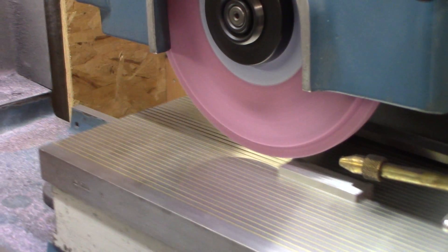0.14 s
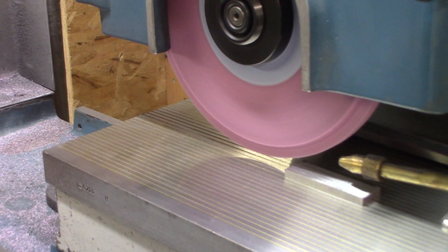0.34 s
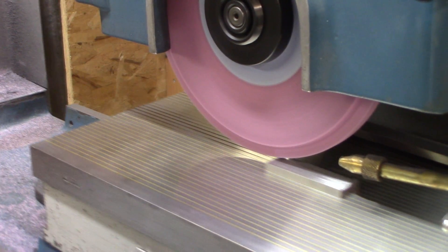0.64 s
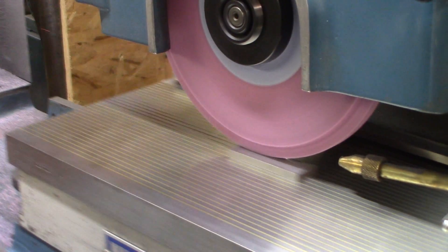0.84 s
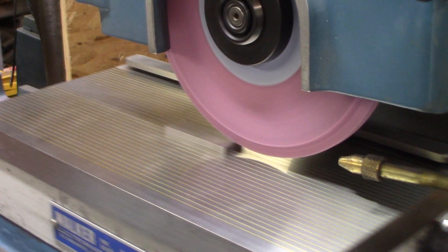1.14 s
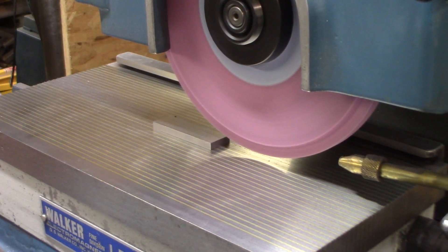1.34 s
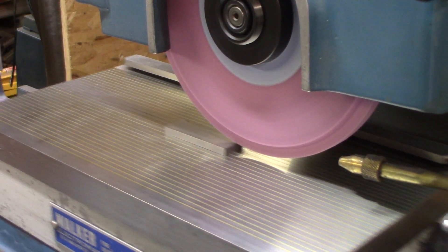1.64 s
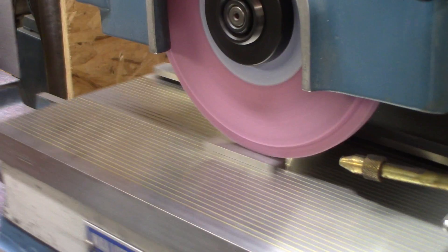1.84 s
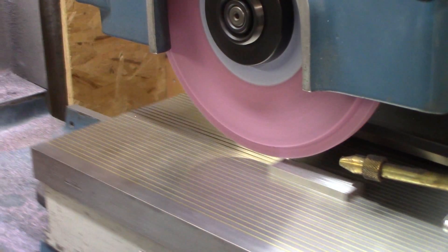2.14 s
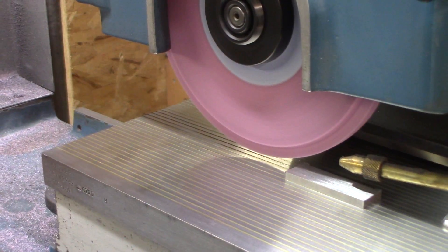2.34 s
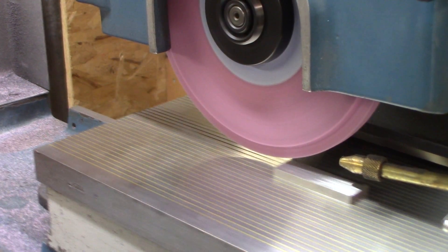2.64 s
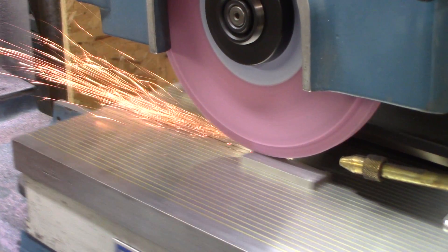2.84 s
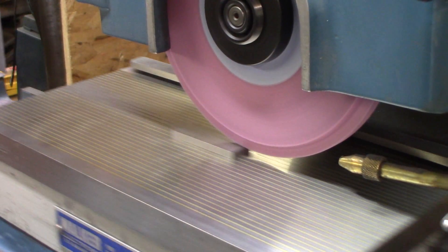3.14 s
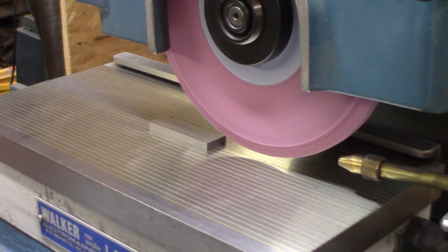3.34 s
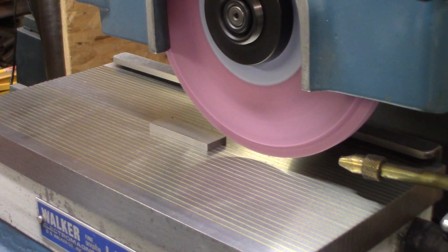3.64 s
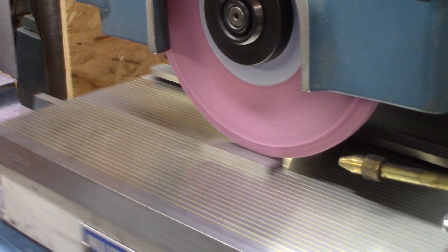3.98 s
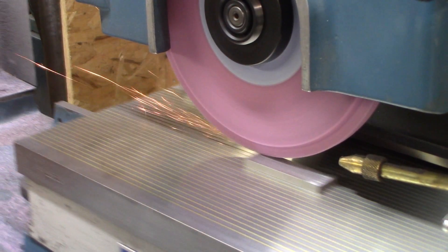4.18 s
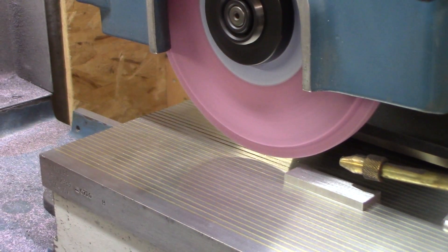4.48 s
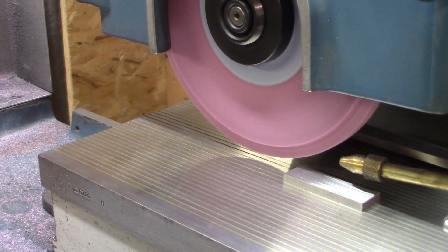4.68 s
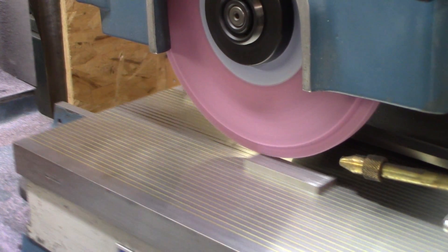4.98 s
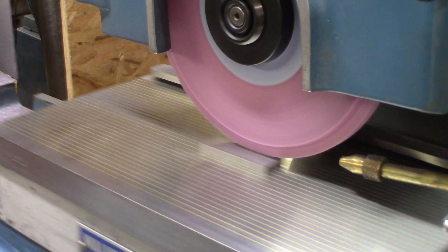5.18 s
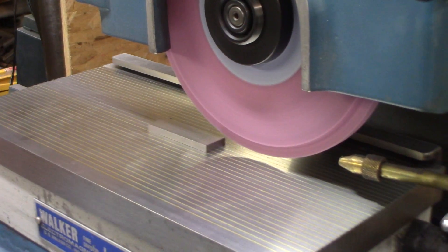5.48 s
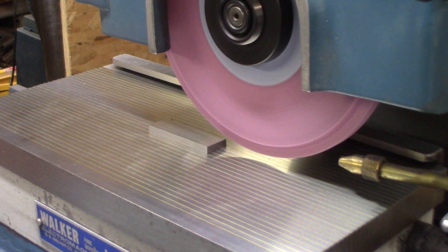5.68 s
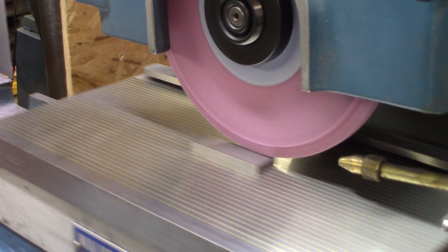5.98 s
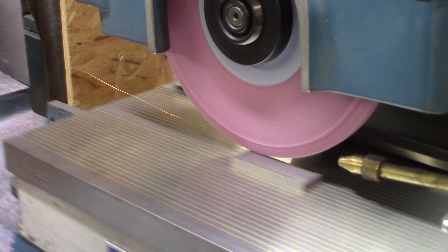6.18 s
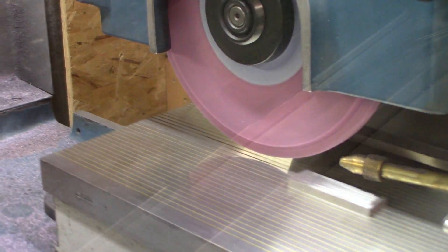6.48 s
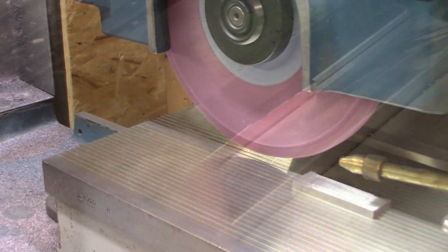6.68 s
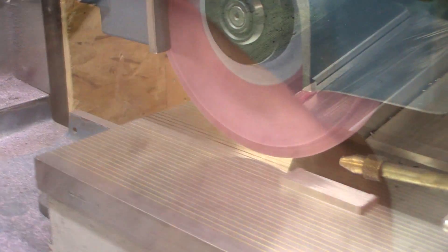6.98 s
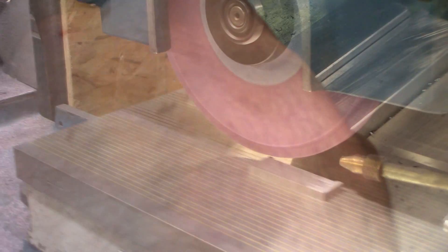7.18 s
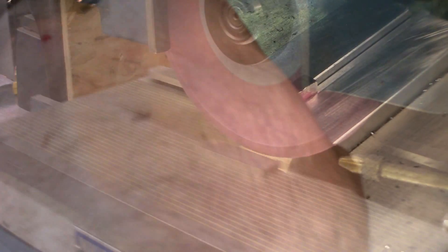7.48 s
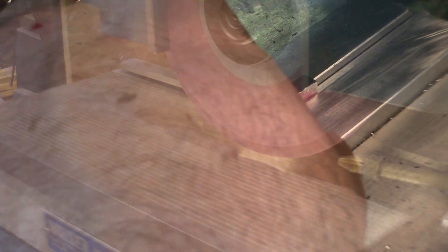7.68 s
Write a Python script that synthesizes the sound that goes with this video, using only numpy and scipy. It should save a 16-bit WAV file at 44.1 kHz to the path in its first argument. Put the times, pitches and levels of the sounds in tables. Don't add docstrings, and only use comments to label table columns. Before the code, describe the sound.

Close stereo sound of a surface grinder running in a machine shop. Worn bearings sing a cluster of wavering metallic tones over motor hum and a soft rush of air. A steel block passes under the wheel about once a second, giving tiny bright gritty zips, some ringing, others barely grazing. The machine fades toward the end.

```python
import sys
import numpy as np
from scipy import signal
from scipy.fft import rfft, irfft, next_fast_len
from scipy.io import wavfile
from scipy.ndimage import uniform_filter1d, minimum_filter1d

SR = 44100
rng = np.random.default_rng(int(sys.argv[2]) if len(sys.argv) > 2 else 0)


def dump(signal):
    limited = np.clip(np.atleast_2d(signal).T, -1, 1)
    pcm = np.round(limited * 32767).astype(np.int16)
    wavfile.write(sys.argv[1], SR, pcm)


def gain_from_db(level_db):
    decades = np.asarray(level_db, float) / 20
    return 10 ** decades


N = 344848
T = np.arange(N) / SR
M = next_fast_len(N, True)
BINS = np.maximum(np.arange(M // 2 + 1) * SR / M, 1)
BALL_HZ, CAGE_HZ, SHAFT_HZ = 407.78, 25.78, 59.88


def shape(table, hz=BINS):
    table_hz, level_db = np.array(table).T
    return np.interp(np.log(hz), np.log(table_hz), level_db)


def noise(power):
    return irfft(rfft(rng.standard_normal(M)) * np.sqrt(power * SR / 2), M)[:N]


# pitch_hz, level_db
SIDE_DB = [(60, -20), (110, -13), (200, -15.5), (380, -17.5), (700, -19), (1290, -22), (2380, -8),
           (4400, -13.5), (8120, -14), (15000, -12)]


def stereo(power, side_db=0.):
    side_power = power * gain_from_db(2 * (shape(SIDE_DB) + side_db))
    return noise(power) + noise(side_power) * np.array([[1], [-1]])


def lines(hz, db, width_hz):
    power = np.zeros(len(BINS))
    for f, gain, w in zip(hz, gain_from_db(db), width_hz):
        first = max(int((f - 4 * w) * M / SR), 0)
        near = slice(first, int((f + 4 * w) * M / SR) + 2)
        bell = np.exp(-.5 * ((BINS[near] - f) / w) ** 2)
        power[near] += gain ** 2 * bell / (bell.sum() * SR / M)
    return power


def walk(rate):
    hold = int(SR / rate)
    steps = np.repeat(rng.standard_normal(N // hold + 1), hold)
    slewed = uniform_filter1d(uniform_filter1d(steps, hold), hold)[:N]
    return slewed / slewed.std()


def swell(rows, rest_db=-45):
    t = T[::64]
    level = gain_from_db(rest_db)
    for peak, length, db in rows:
        level = level + gain_from_db(db) * np.cos(np.pi * np.clip((t - peak) / length, -.5, .5))
    return np.interp(T, t, level)


# start_s, slip_turns (whole turns throb in level, half turns in pitch)
CAGE_SLIP = [(0, .3), (.45, .55), (.8, .25), (1.6, .05), (2.25, .48), (2.45, .55), (2.65, 1), (3.05, .7),
             (3.25, .32), (3.65, .29), (3.85, -.04), (4.05, -.11), (4.45, .27), (4.65, .53), (5.25, .55),
             (5.45, .8), (6.1, .73), (6.65, 1.32), (7.2, 1.6)]
# start_s, slip_turns (whole turns: crisp beads)
THIRD_SLIP = [(.1, .33), (.4, .62), (1, 1.1), (1.3, .74), (2.2, .5), (3.1, .14), (3.4, -.37), (4, -.4),
              (4.3, .06), (5.2, .4), (5.8, -.42), (6.7, -.1), (7.2, -.1)]


def bearing(table, orders, lean, spin, start, slip=.1):
    side = np.array([[.5], [-.5]])
    lower = 2 * np.pi * np.interp(T, *np.transpose(CAGE_SLIP))
    third = 2 * np.pi * np.interp(T, *np.transpose(THIRD_SLIP)) - lower
    out = 0
    for (ball, cage), rows, (pan_db, lead) in zip(orders, table, lean):
        phase = ball * spin + start[ball] + slip * walk(2.89)
        phase = phase + 2 * np.pi * cage * (CAGE_HZ * T + 0.1098 * ball)
        if cage < 0:
            phase = phase + lower
        elif cage == 2:
            phase = phase - 1
        elif cage == 3:
            phase = phase + third
        tone = swell(rows) * np.exp(1j * phase)
        out = out + (np.sqrt(2) * gain_from_db(pan_db * side) * np.exp(1j * lead * side) * tone).imag
    return out


# left_minus_right_db, left_lead_rad.
SONG_A_ORDERS = [(2, 0), (2, 1), (3, 0), (4, 0)]
SONG_A = [
    [(0.07, 4.9, -17.5), (0.41, 0.85, -33), (1.11, 0.33, -44), (1.89, 1.75, -27.5), (2.02, 0.43, -29),
     (2.28, 0.22, -39.2), (3.31, 1.55, -23), (3.67, 0.38, -38.1), (4.96, 3.57, -23.5), (5.77, 1.6, -25),
     (5.96, 0.85, -26.5), (7.36, 2.1, -19), (7.49, 0.33, -36)],
    [(0.08, 0.44, -39), (0.8, 0.44, -41.3), (1.5, 0.34, -41), (2.64, 1.4, -30.5), (2.95, 0.62, -30.5),
     (3.5, 0.64, -27), (4.21, 0.72, -27.5), (4.67, 0.41, -30), (5.04, 0.45, -30.5), (5.18, 2.1, -35.1),
     (5.58, 0.48, -29), (6.86, 0.32, -44), (7.13, 1.46, -31)],
    [(0.13, 0.77, -26.5), (0.81, 3.46, -33.5), (1.0, 0.32, -49), (2.33, 1.8, -28), (2.42, 0.64, -34),
     (3.0, 0.58, -36), (3.74, 0.79, -36), (3.81, 4.3, -30), (5.29, 0.31, -39.9), (5.55, 1.63, -24),
     (6.68, 0.36, -39), (7.29, 1.8, -26), (7.65, 0.46, -33)],
    [(0.28, 1.12, -13), (0.56, 0.52, -26), (1.13, 0.63, -25.5), (1.35, 1.05, -11.5), (2.36, 0.84, -20.5),
     (2.61, 0.41, -22), (3.35, 0.78, -15.5), (3.95, 5.3, -25.5), (4.18, 0.53, -18.5), (5.12, 0.56, -22),
     (5.91, 0.45, -23), (6.35, 3.11, -18), (6.78, 0.59, -29)],
]
SONG_A_LEAN = [(-1.55, -0.011), (1.5, -.09), (2, -.03), (-1.2, -0.078)]
SONG_B_ORDERS = [(7, -1), (7, 1), (8, 1)]
SONG_B = [
    [(0.13, 1.1, -22), (1.43, 0.63, -27), (1.55, 2.1, -25), (2.54, 0.59, -35), (3.0, 0.42, -26),
     (3.33, 0.34, -35), (4.15, 0.25, -31.7), (4.72, 0.66, -27.4), (4.79, 2.7, -26.5), (6.17, 0.3, -24),
     (6.58, 1.8, -24.7), (6.67, 0.45, -29.2), (6.94, 0.35, -23.5), (7.52, 0.53, -18)],
    [(-0.58, 3.2, -24), (0.64, 0.4, -44.0), (1.42, 0.62, -28.5), (2.29, 2.3, -27.7), (2.72, 0.41, -32.8),
     (3.19, 0.94, -27.9), (3.85, 0.55, -29), (4.44, 0.4, -36), (4.86, 1.33, -22.5), (5.8, 0.73, -30),
     (6.43, 0.63, -31), (6.93, 1.62, -23.5)],
    [(-0.05, 0.52, -24), (0.95, 0.75, -29), (1.39, 0.38, -35), (1.76, 0.52, -28.5), (3.04, 0.75, -27.4),
     (4.23, 0.39, -30.5), (4.71, 0.5, -31.8), (5.12, 0.46, -22.5), (5.49, 0.58, -37), (6.62, 0.6, -36.4),
     (7.1, 0.23, -32.4), (7.39, 0.26, -29.6), (7.66, 0.32, -35.9)],
]
SONG_B_LEAN = [(1.5, 0.16), (-4, 0.2), (0, 0.16)]
SONG_C_ORDERS = [(2, -1), (5, -1), (5, 1), (6, -1)]
SONG_C = [
    [(-0.6, 2.24, -19.5), (0.76, 1.03, -33.8), (2.08, 1, -35), (2.71, 0.42, -49.5), (3.26, 0.56, -25),
     (3.86, 0.32, -39), (4.02, 1.05, -25.5), (4.37, 2.8, -38.0), (6.07, 0.58, -37), (6.26, 2.2, -35),
     (7.77, 1.72, -23.8)],
    [(-0.08, 2.5, -31), (1.42, 0.76, -38), (2.02, 1.01, -28.5), (3.03, 0.93, -32), (3.69, 0.74, -44),
     (3.74, 2.6, -37.5), (4.54, 0.84, -38), (4.98, 0.3, -39.8), (5.9, 1.42, -38), (7.51, 0.8, -28)],
    [(0.37, 0.37, -35), (0.76, 0.62, -24), (1.17, 0.58, -37), (1.76, 0.32, -34), (2.74, 1.5, -36),
     (2.86, 0.76, -31), (4.09, 0.71, -28.5), (4.96, 1, -28.5), (6.06, 0.52, -30), (6.49, 0.55, -29.4),
     (7.27, 1.34, -36.2)],
    [(-0.6, 2.11, -33), (0.77, 0.53, -35.8), (2.55, 0.69, -29.7), (3.25, 0.59, -33.6), (3.88, 0.79, -28.5),
     (4.05, 1.9, -30), (5.43, 0.47, -36), (6.06, 0.43, -34.1), (6.1, 1.05, -28.4), (7.46, 1.71, -33)],
]
SONG_C_LEAN = [(1, 0.21), (-0.5, 0.32), (-0.5, 0.041), (3.5, -0.76)]
SONG_D_ORDERS = [(2, 2), (5, 0), (7, 3), (8, -1), (16, -1)]
SONG_D = [
    [(-0.19, 3, -32.5), (0.81, 0.59, -35), (2.17, 0.74, -35), (2.95, 0.41, -44), (3.99, 3.6, -29),
     (4.36, 0.89, -28), (6.39, 0.39, -43.2), (7.18, 1.8, -29), (7.31, 0.55, -41), (7.83, 4.97, -47)],
    [(0.88, 0.82, -31), (1.88, 0.88, -30), (2.01, 0.32, -46), (3.39, 0.84, -34), (4.34, 0.65, -32),
     (5.14, 0.52, -34), (5.28, 0.8, -33), (6.19, 0.37, -39), (6.63, 1.23, -39), (7.24, 2.55, -47)],
    [(0.17, 2.2, -33), (1.67, 0.51, -42), (1.88, 2.97, -31), (3.83, 0.48, -38), (4.1, 1.92, -38.2),
     (5.43, 0.41, -45.7), (5.58, 1.5, -38.8), (7.21, 0.47, -53.5), (8.1, 1.9, -27)],
    [(0.43, 0.27, -37.4), (0.71, 0.28, -26), (1.87, 0.33, -39), (2.6, 0.85, -28.5), (3.11, 0.29, -36.3),
     (4.75, 0.98, -37), (5.66, 0.57, -37.6), (6.57, 0.49, -34), (7.05, 0.53, -31.2), (7.42, 0.3, -39),
     (7.72, 0.31, -38)],
    [(0.51, 0.46, -33), (1.06, 0.45, -38), (2.84, 0.23, -35.4), (3.32, 1.9, -43), (4.08, 0.36, -36),
     (5.24, 0.46, -29.5), (5.84, 0.41, -44), (6.45, 0.46, -40), (7.82, 0.54, -32)],
]
SONG_D_LEAN = [(0.1, -0.021), (0.1, 0.095), (0.1, .3), (0.1, -.3), (0.1, .1)]
SONG_E_ORDERS = [(6, 1), (9, 1), (9, -1)]
SONG_E = [
    [(-0.24, 4.8, -27), (0.63, 0.92, -20), (2.35, 0.35, -34.8), (2.57, 1.23, -15.5), (3.31, 0.32, -27),
     (3.88, 0.36, -27), (4.58, 2.1, -35), (4.79, 0.71, -26.5), (6.43, 0.4, -29.4), (6.81, 2.7, -28)],
    [(0.18, 1.2, -38), (1.77, 0.64, -42.0), (2.71, 0.37, -44), (3.5, 0.85, -33.5), (4.47, 0.2, -42),
     (5.27, 0.74, -42), (5.62, 0.59, -37), (6.46, 0.22, -37), (6.97, 0.49, -31), (7.5, 0.48, -37)],
    [(0.55, 0.63, -38), (0.93, 0.36, -33), (1.61, 0.5, -38.4), (1.98, 0.16, -41), (2.25, 0.21, -40),
     (2.94, 0.92, -42), (3.31, 0.35, -42), (4.15, 0.36, -52.7), (5.6, 0.59, -45), (7.17, 0.22, -42)],
]
SONG_E_LEAN = [(1.5, -0.63), (-2, 0.068), (-1, -0.03)]
SONG_F_ORDERS = [(15, -1), (10, -1), (16, 1), (10, 1), (2, -2)]
SONG_F = [
    [(0.51, 0.55, -47.2), (2.56, 0.67, -33.5), (3.36, 0.51, -43), (4.02, 0.42, -43), (4.64, 0.4, -37),
     (5.15, 0.81, -40.4), (6.08, 0.33, -43.8), (6.63, 0.62, -48)],
    [(0.9, 0.36, -52.6), (1.55, 0.48, -48.2), (3.38, 0.21, -54.8), (3.72, 0.25, -35.8), (4.04, 0.2, -53.5)],
    [(0.55, 0.57, -57), (1.19, 0.3, -56.9), (4.02, 0.36, -47.1), (4.76, 0.46, -31), (5.38, 0.47, -52),
     (5.6, 0.43, -36), (6.11, 0.39, -44), (7.31, 0.29, -38)],
    [(0.71, 0.61, -36), (2.5, 0.67, -42.6), (5.89, 0.23, -49), (6.16, 0.23, -50.0), (7.55, 0.28, -54.4)],
    [(1.14, 0.53, -54), (2.01, 2.6, -36), (2.31, 1.1, -53), (3.03, 0.42, -43.8), (4.08, 0.56, -52),
     (4.38, 0.22, -48), (4.98, 0.71, -48), (5.69, 1.9, -40)],
]
SONG_F_LEAN = [(.1, .1), (.1, .1), (.1, .1), (.1, .1), (.1, .01)]
SONG_G_ORDERS = [(4, 1), (4, -2), (4, -1)]
SONG_G = [
    [(.1, .5, -41), (.65, .9, -35), (2.6, .4, -45), (3.8, 0.46, -38), (5.4, 1.5, -30.5), (6.4, 1.1, -38),
     (7.4, 2.1, -33)],
    [(.3, 1.3, -33), (1.1, .4, -41), (2.8, 2.4, -37), (4.7, 2, -31.5), (6.4, 1.1, -32), (7.6, 0.7, -30)],
    [(.3, .9, -35), (.8, 0.26, -33), (2.5, .95, -47), (4.1, 0.7, -35), (5.1, 0.71, -36), (7.2, 0.77, -45)],
]
SONG_G_LEAN = [(.1, .05), (.1, .05), (.1, .05)]


def singing(spin):
    start = 2 * np.pi * rng.random(size=18)
    groups = [(SONG_A, SONG_A_ORDERS, SONG_A_LEAN), (SONG_B, SONG_B_ORDERS, SONG_B_LEAN),
              (SONG_C, SONG_C_ORDERS, SONG_C_LEAN), (SONG_D, SONG_D_ORDERS, SONG_D_LEAN),
              (SONG_E, SONG_E_ORDERS, SONG_E_LEAN), (SONG_F, SONG_F_ORDERS, SONG_F_LEAN), (SONG_G, SONG_G_ORDERS, SONG_G_LEAN)]
    return sum(bearing(*group, spin, start) for group in groups)


# pitch_hz, level_db
HOUSING = [(400, -51.5), (1500, -41.5), (3600, -39.5), (4100, -54), (4500, -44.5), (5500, -51.5),
           (6100, -47.5), (6500, -48.5), (7100, -50.5), (8500, -55), (9400, -46), (10200, -51.5),
           (11400, -62.5), (15000, -69.5)]
CAGE_DB = [-8, -10.5, -5, -7, -11.5]
SHAFT_DB = [-1.1, -18.5, -13.5]
# pitch_hz, level_db
SIDEBANDS = [(459.5, -42), (706.6, -39), (721.7, -38), (901.4, -43), (1171.7, -38), (1197.7, -39),
             (1275.0, -43), (1317.7, -38), (1554.1, -39), (1248, -42), (1962, -43), (2301, -45),
             (2352, -43), (2540, -43), (2675, -46), (2758, -46), (2947, -45), (3499, -45), (4077, -48),
             (4460, -47), (4815, -47), (4869, -52), (4958, -49), (6115, -46), (6180, -48), (6209, -45),
             (6309, -50), (6446, -48), (7025, -51), (7253, -50), (7340, -48), (8381, -53), (8691, -53),
             (9286, -49), (9404, -46), (9471, -52), (9735, -49), (10169, -48), (1683.2, -38), (1708.9, -43),
             (2465.6, -42), (2592.2, -41), (2776.7, -43), (2854.4, -41), (3314.3, -49), (3340.3, -40),
             (3747.7, -45), (6142.5, -45), (5912, -46)]


def comb(slip_hz=.12, scatter_db=2.5, skirt_db=-3.5, skirt_hz=55):
    ball, cage, shaft = (v.ravel() for v in np.mgrid[1:38, -4:5, -2:3])
    hz = ball * BALL_HZ + cage * CAGE_HZ + shaft * SHAFT_HZ
    db = shape(HOUSING, hz) + np.take(CAGE_DB, abs(cage)) + np.take(SHAFT_DB, abs(shaft))
    db = db + scatter_db * rng.standard_normal(len(hz))
    listed = SONG_A_ORDERS + SONG_B_ORDERS + SONG_C_ORDERS + SONG_D_ORDERS + SONG_E_ORDERS + SONG_F_ORDERS + SONG_G_ORDERS
    sung = [s == 0 and (b, c) in listed for b, c, s in zip(ball, cage, shaft)]
    db = db - 99 * np.array(sung)
    strong_hz, strong_db = np.transpose(SIDEBANDS)
    centre = np.arange(1, 38) * BALL_HZ
    power = lines(hz, db, slip_hz * ball)
    power = power + lines(strong_hz, strong_db, slip_hz * strong_hz / BALL_HZ)
    skirts = lines(centre, shape(HOUSING, centre) + skirt_db, np.full(len(centre), skirt_hz))
    return stereo(power + skirts)


def housing_hiss():
    return stereo(lines([6350], [-42], [330]))


# pitch_hz, level_db
MOTOR = [(52, -82), (59.9, -67.5), (119.8, -67), (179.6, -56), (239.5, -56), (280, -49.5), (419.2, -31.5),
         (1940.1, -31.5)]


def motor(lead=0.12):
    side = np.array([[-.5], [.5]])
    out = 0
    for hz, db in MOTOR:
        level = np.sqrt(2) * gain_from_db(db + .5 * walk(6.0))
        out = out + level * np.sin(2 * np.pi * (hz * T + rng.random()) + lead * side)
    return out


# pitch_hz, level_db (per Hz)
RUSH = [(22, -82), (40, -92), (90, -86.5), (170, -70.5), (260, -63.5), (400, -62.5), (700, -55.5),
        (850, -56), (1000, -60.5), (2000, -62.5), (3100, -68.5), (5200, -71.5), (6300, -72), (8000, -75),
        (9500, -74), (12000, -82.5), (15500, -90)]


def rush():
    return gain_from_db(0.079 * walk(1.5)) * stereo(gain_from_db(2 * shape(RUSH)), side_db=-2.5)


# pitch_hz, level_db
OUTER = [(3000, -73), (4000, -16), (7000, 0), (15000, -48)]
# pitch_hz, level_db
INNER = [(3000, -24), (6100, -1.5), (6500, -6), (7100, 9.5), (8500, -21), (9400, -17), (12000, -47)]


def blows(round_hz, colour, slip=1.78, count=3):
    train = 0
    for _ in range(count):
        spin = 2 * np.pi * (BALL_HZ * T + rng.random()) + slip / 10 * walk(1.172)
        clicks = np.sin(38.5 * spin) / (2 * np.sin(spin / 2) + 1e-9)
        train = train + clicks * np.cos(2 * np.pi * (round_hz * T + 0.087 * walk(0.705)))
    gain = gain_from_db(shape(HOUSING) + shape(colour)) * np.sqrt(8 / count) * (BINS > 3000)
    wander = np.interp(BINS, np.arange(60) * BALL_HZ, rng.standard_normal(size=60))
    mid = irfft(rfft(train, M) * gain * np.exp(1j * 1.07 * wander), M)[:N]
    return mid + 0.19 * np.gradient(mid) * np.array([[1], [-1]])


# start_s, end_s, rise_s, grit_level_db, wheel_ring_db (against grit)
PASSES = [
    (0.032, 0.07, 0.017, -28.5, -6),
    (0.823, 0.882, .0015, -33.5, -2),
    (1.115, 1.145, .01, -51, -11),
    (2.08, 2.125, 0.033, -31, 1),
    (2.894, 2.924, .002, -33, 1),
    (3.178, 3.215, .01, -48, -8),
    (4.23, 4.268, 0.012, -39, -13),
    (5.075, 5.125, .01, -54, -10),
    (6.275, 6.325, .02, -48, -8),
]


def lag(sag=.0045, recover_s=.07):
    cut = 0
    for start, end, rise, db, _ in PASSES:
        cut = cut + gain_from_db(db + 31) * (T > start + rise / 2) * (T < end + .01)
    return signal.lfilter([sag / SR], [1, -np.exp(-1 / (recover_s * SR))], cut)


LOW_RING_DB = [-14, -12, -.1, -14, -10, -.1, -3, -.1, -.1]
RUNOUT = [0.51, .12, .3, .6, .15, .3, .3, .3, .3]
# pitch_hz, level_db
GRIT = [(1000, -34), (2500, -23), (3500, -3), (4500, -12), (6000, 2.5), (7500, -7), (9500, 2), (11500, -7),
        (13500, -1), (15600, -14)]
WHEEL_HZ = [3540, 3885, 4880, 5916, 6406, 8750, 10336, 11886, 13795, 15243]
# level_db, t60_s
WHEEL = [(17.5, 0.22), (-2, .15), (-13, 0.16), (3.5, 0.055), (14, 0.2), (6, 0.094), (-3, 0.036), (-5, 0.17),
         (-6, 0.035), (-14, .04)]
CATCH_MODES = [0, 4, 7, 5]
# start_s, level_db
CATCHES = [
    [(0.043, 36), (0.06193, 34), (0.835, 36), (0.85393, 33), (2.111, 45), (2.906, 38)],
    [(0.04, 35), (0.06404, 35), (0.838, 35), (0.86204, 31), (2.11, 41), (2.13404, 33), (2.916, 37)],
    [(0.067, 52), (0.832, 44)],
    [(0.058, 38), (2.115, 40)],
]


def grinding(turn=0.047, grit_db=-33, ring_db=-19, fall_s=0.0041, echo_db=-14, echo_s=0.015,
             grain_db=-2.0, tear_db=-2.0):
    bite, ring, low = 0, 0, 0
    high_spot = 1 - 2 * uniform_filter1d((SHAFT_HZ * T + turn) % 1, size=66)
    for (start, end, rise, db, wheel_db), low_db, runout in zip(PASSES, LOW_RING_DB, RUNOUT):
        after = np.maximum(T - end, 0)
        release = np.exp(-after / fall_s) + gain_from_db(echo_db) * np.exp(-after / echo_s)
        touch = np.clip((T - start) / rise, 0, 1) * release
        touch = touch * (1 + np.clip(runout, 0, 1) * high_spot * (after == 0))
        bite = bite + gain_from_db(db) * touch
        ring = ring + gain_from_db(db + wheel_db) * touch
        low = low + gain_from_db(db + wheel_db + low_db) * touch
    rough = gain_from_db(grain_db * walk(250.0))
    hiss = bite * rough * stereo(gain_from_db(2 * (shape(GRIT) + grit_db)))
    tear = rfft(ring * rough * rng.standard_normal(N), M) * np.sqrt(SR / 2)
    modes = [gain_from_db(db) / (1 + 2j * np.pi * (BINS - hz) * t60 / np.log(1000))
             for hz, (db, t60) in zip(WHEEL_HZ, WHEEL)]
    rung = rfft(low * rng.standard_normal(N), M) * np.sqrt(SR / 2) * modes[0]
    for k, rows in zip(CATCH_MODES, CATCHES):
        for start, db in rows:
            rung = rung + gain_from_db(db) * np.exp(-2j * np.pi * BINS * start) * modes[k]
    for k in range(1, len(modes)):
        share = gain_from_db(tear_db) if k in CATCH_MODES else 1
        rung = rung + tear * share * modes[k]
    return hiss + gain_from_db(ring_db) * irfft(rung, M)[:N]


# start_s, level_db
FADE = [(0, 0.5), (6.4, 1), (7.0, -2.5), (7.6, -7), (7.82, -9)]
# start_s, level_db
LOAD = [(0.0, -42), (0.35, -29), (0.54, -29.5), (1.41, -31.5), (1.79, -29), (2.77, -27), (3.01, -31),
        (3.44, -29), (3.68, -36), (4.07, -23.5), (4.44, -28), (4.79, -24), (5.36, -25.5), (5.81, -35),
        (6.27, -35), (7.27, -36), (7.43, -35), (7.82, -40)]


def scene():
    fade = gain_from_db(np.interp(T, *np.transpose(FADE)))
    load = gain_from_db(np.interp(T, *np.transpose(LOAD)) + 32.0)
    spin = 2 * np.pi * BALL_HZ * (T - lag()) + 0.075 * walk(2.416)
    sung = singing(spin) / gain_from_db(FADE[0][1])
    rattle = comb()
    high_pass = signal.butter(4, 5400, "high", fs=SR, output="sos")
    top = signal.sosfilt(high_pass, rattle)
    rattle = rattle * fade + top * (0.16 * load - 0.35 * fade) + load * housing_hiss()
    idle = (motor() + rush() + sung) * fade
    clicks = blows(CAGE_HZ, OUTER) + blows(SHAFT_HZ - CAGE_HZ, INNER)
    return rattle + idle + clicks * load + grinding()


def top_cut(x):
    return signal.sosfilt(signal.butter(12, 15710, fs=SR, output="sos"), x)


def record(dry, ceiling=.85):
    peak = abs(dry).max(axis=0) + 1e-9
    room = minimum_filter1d(np.minimum(ceiling / peak, 1), size=441)
    held = dry * uniform_filter1d(room, size=441)
    low_pass = signal.ellip(10, .2, 70, 15760, fs=SR, output="sos")
    return top_cut(signal.sosfilt(low_pass, held))


dry = scene()
out = record(dry)
dump(out)
```